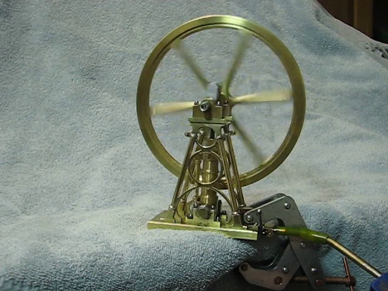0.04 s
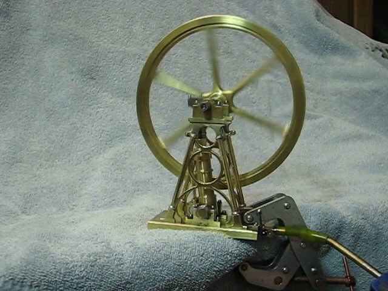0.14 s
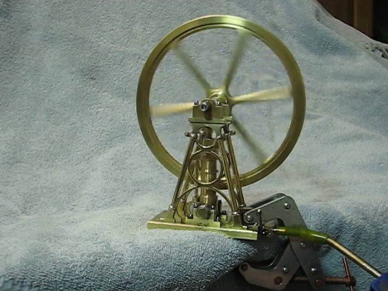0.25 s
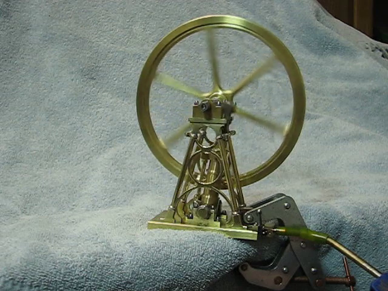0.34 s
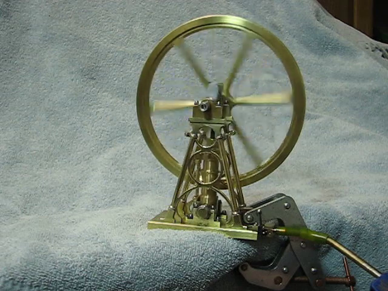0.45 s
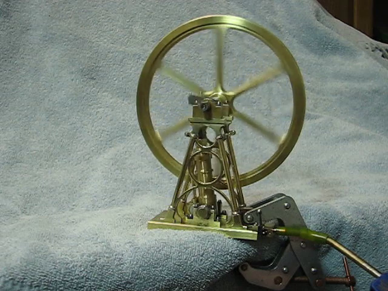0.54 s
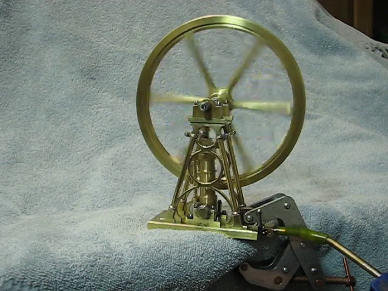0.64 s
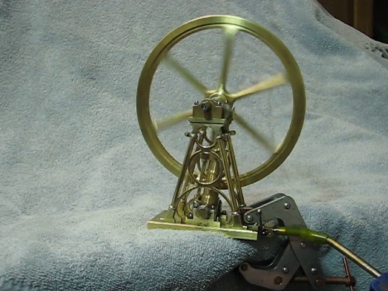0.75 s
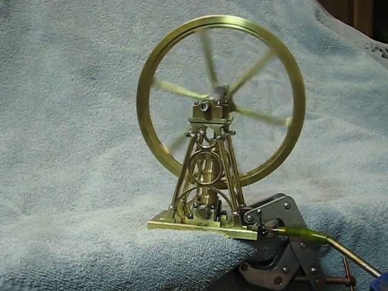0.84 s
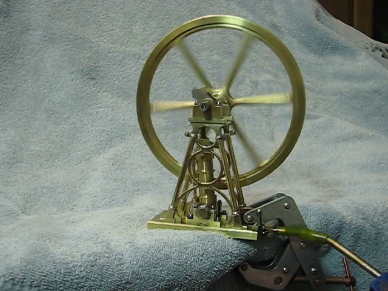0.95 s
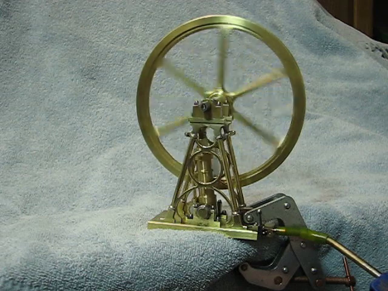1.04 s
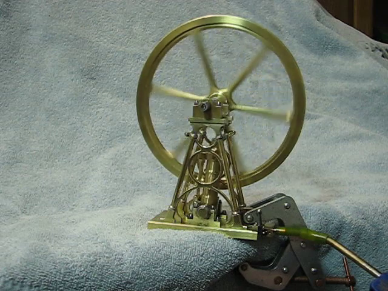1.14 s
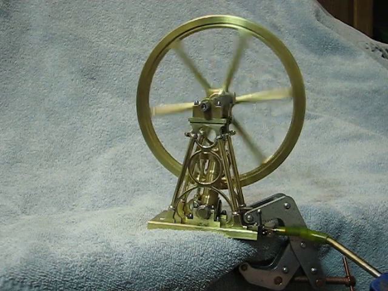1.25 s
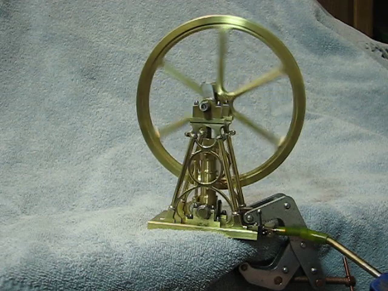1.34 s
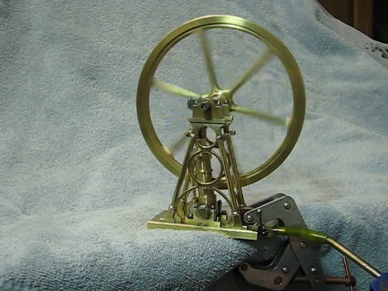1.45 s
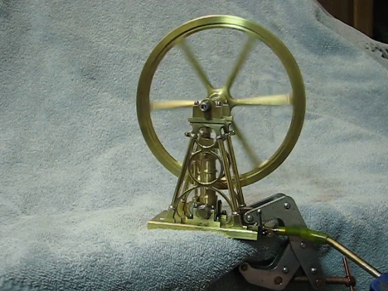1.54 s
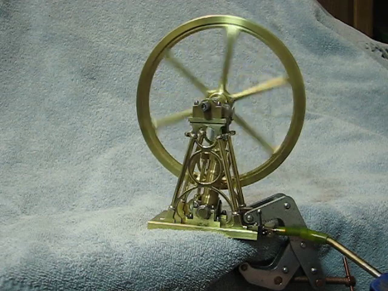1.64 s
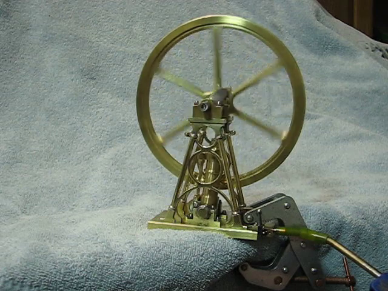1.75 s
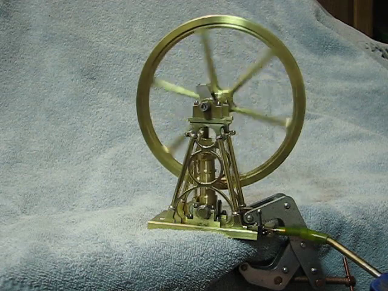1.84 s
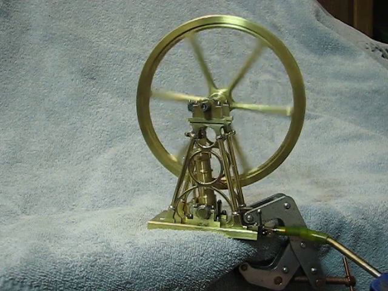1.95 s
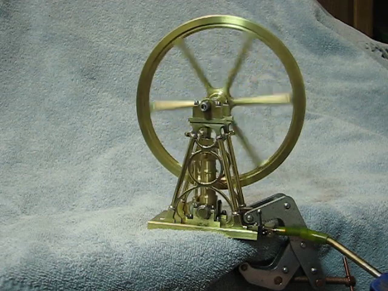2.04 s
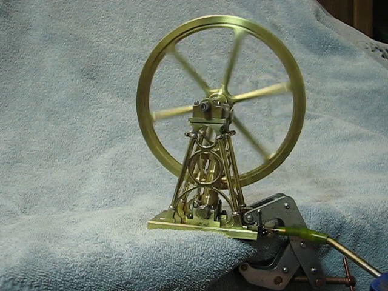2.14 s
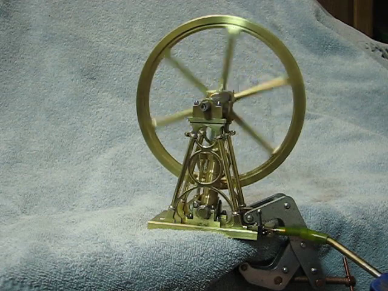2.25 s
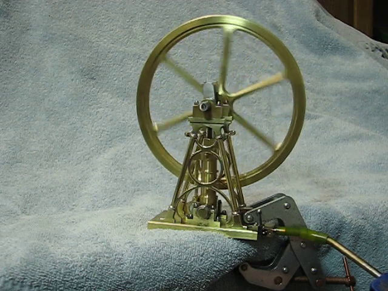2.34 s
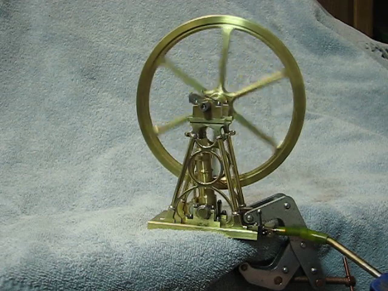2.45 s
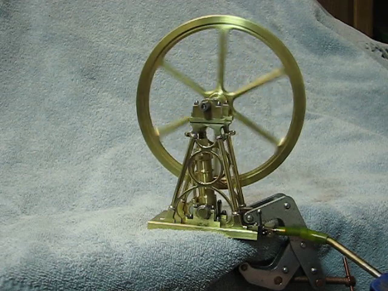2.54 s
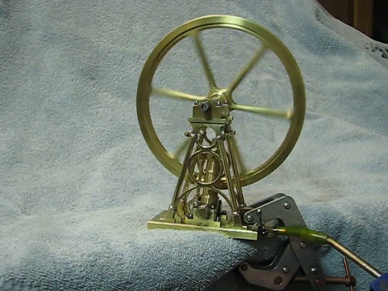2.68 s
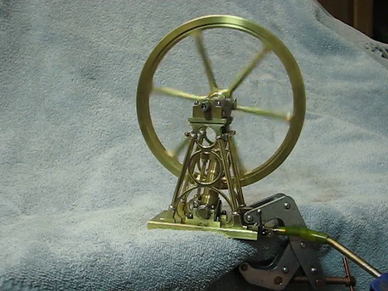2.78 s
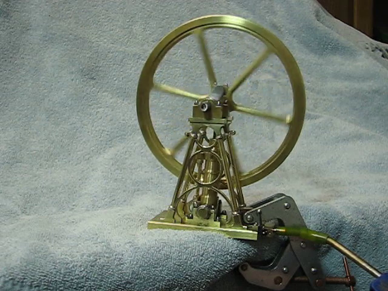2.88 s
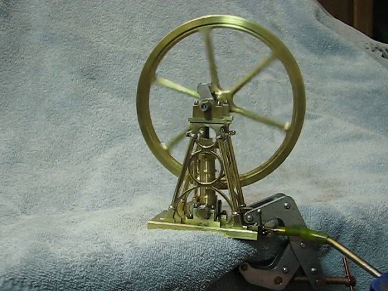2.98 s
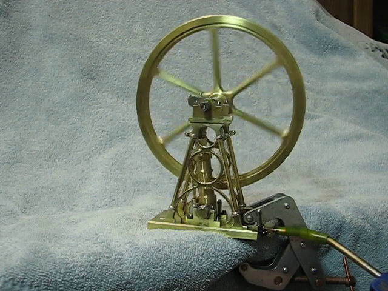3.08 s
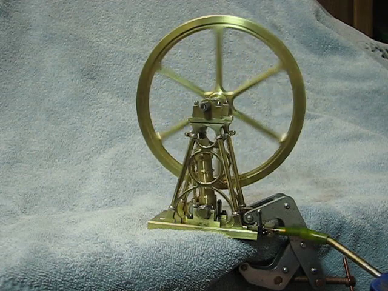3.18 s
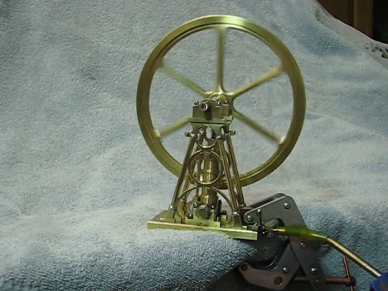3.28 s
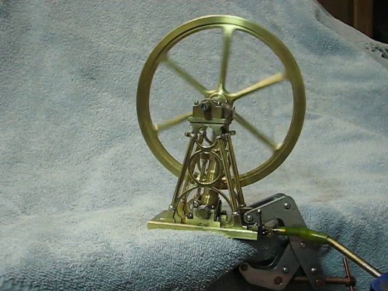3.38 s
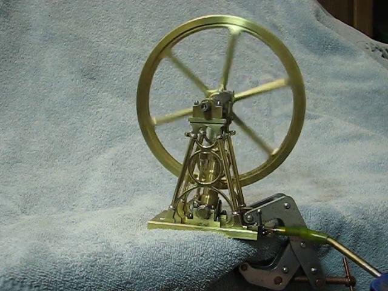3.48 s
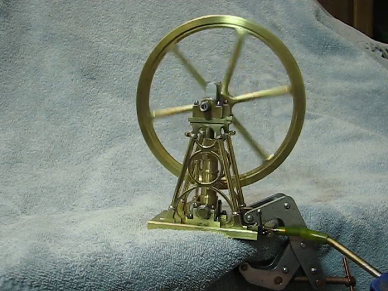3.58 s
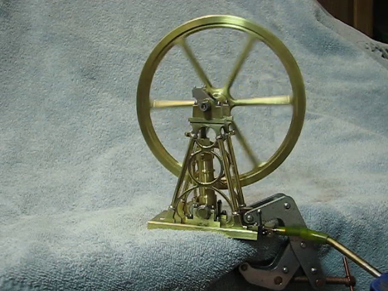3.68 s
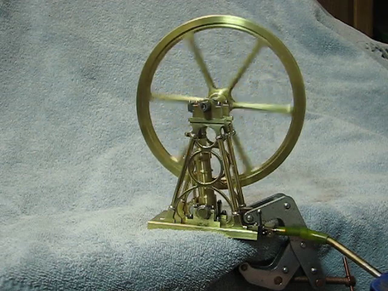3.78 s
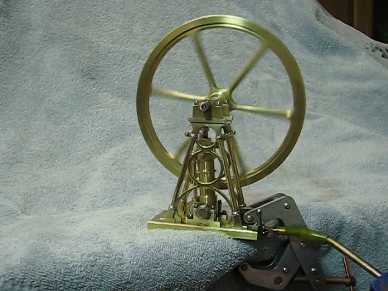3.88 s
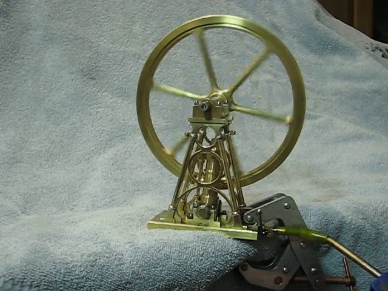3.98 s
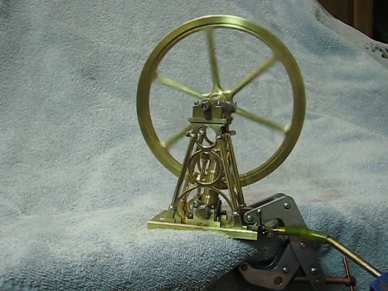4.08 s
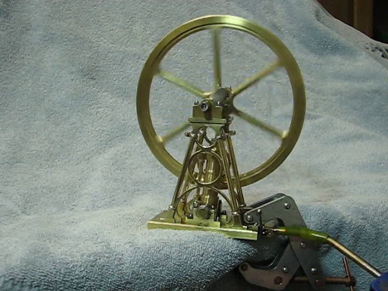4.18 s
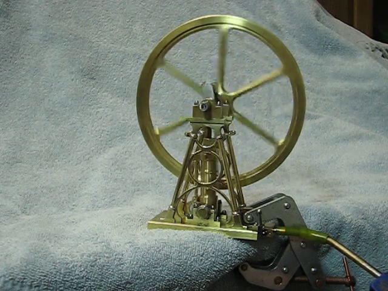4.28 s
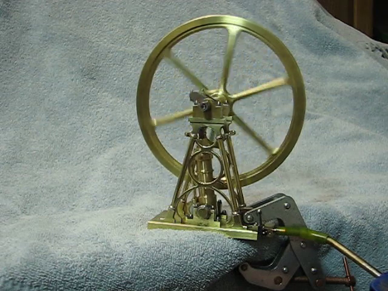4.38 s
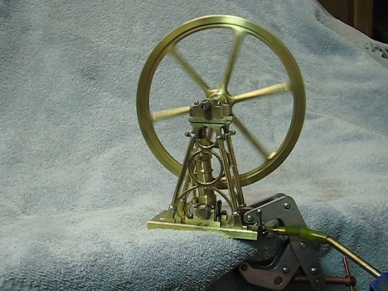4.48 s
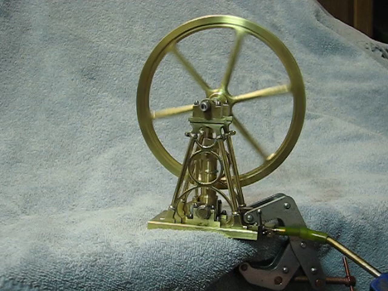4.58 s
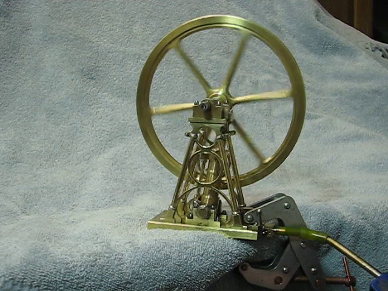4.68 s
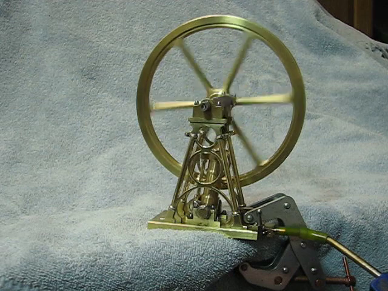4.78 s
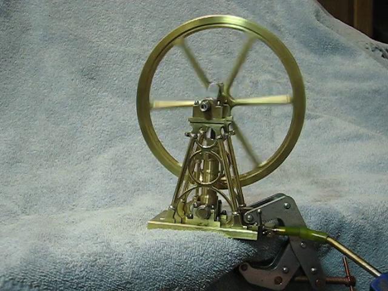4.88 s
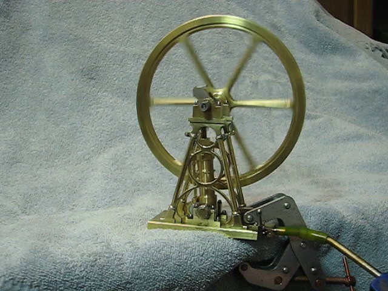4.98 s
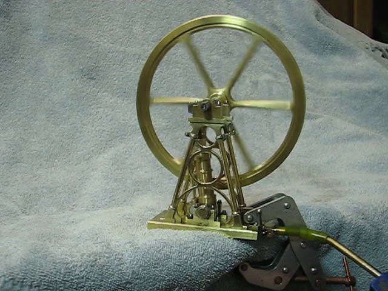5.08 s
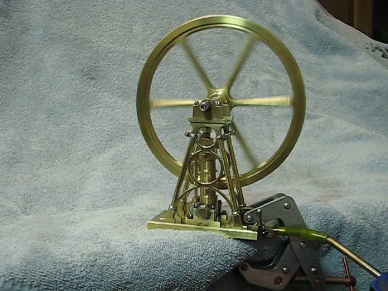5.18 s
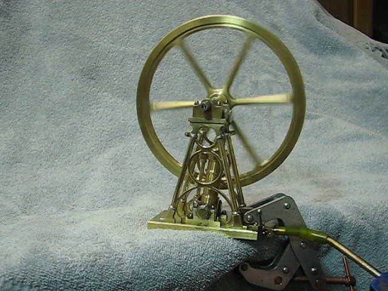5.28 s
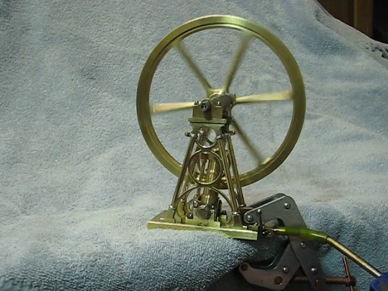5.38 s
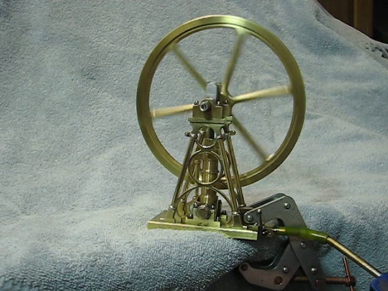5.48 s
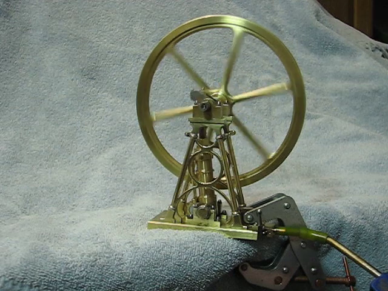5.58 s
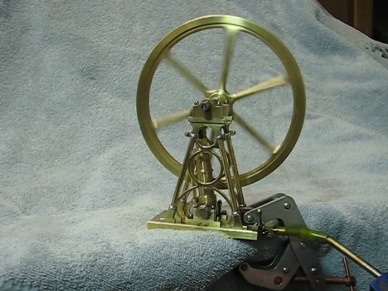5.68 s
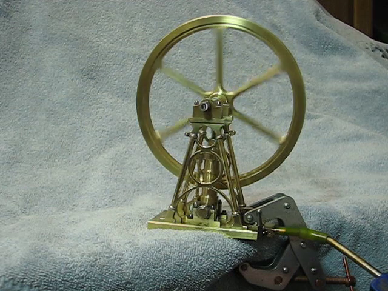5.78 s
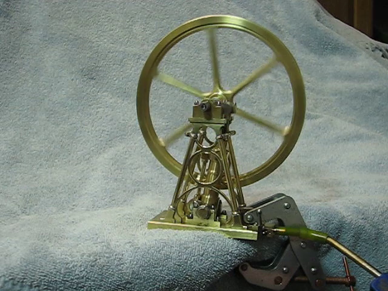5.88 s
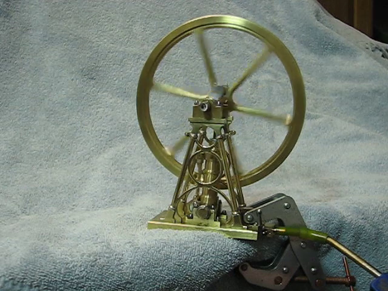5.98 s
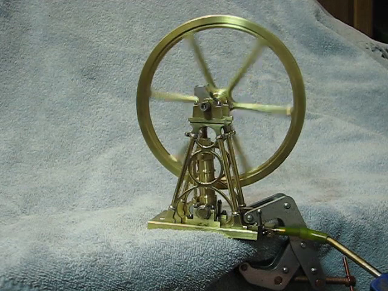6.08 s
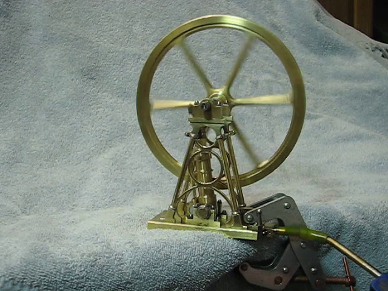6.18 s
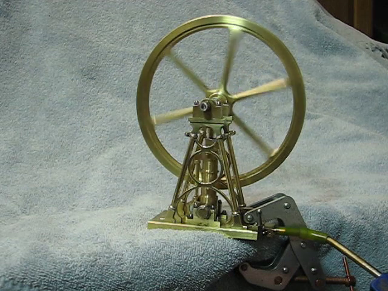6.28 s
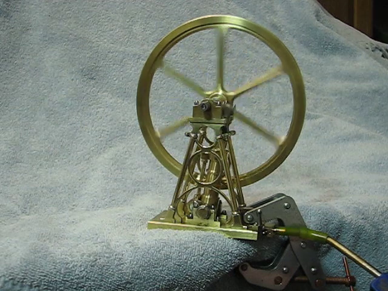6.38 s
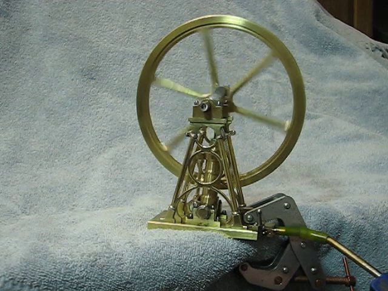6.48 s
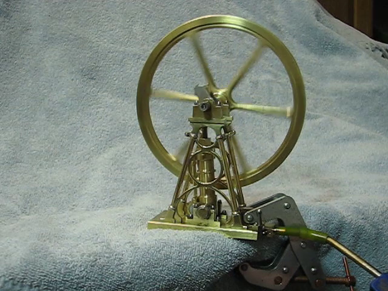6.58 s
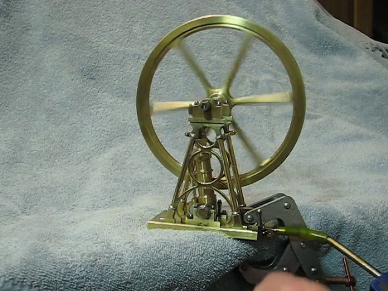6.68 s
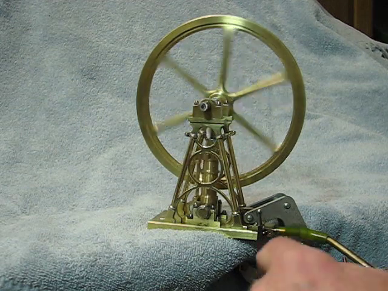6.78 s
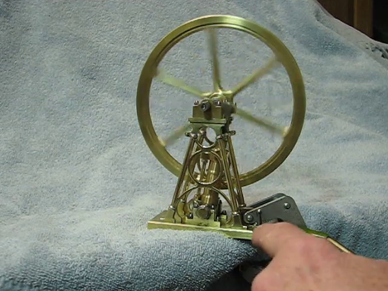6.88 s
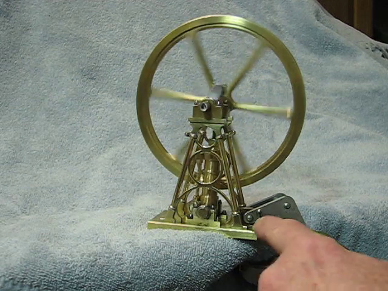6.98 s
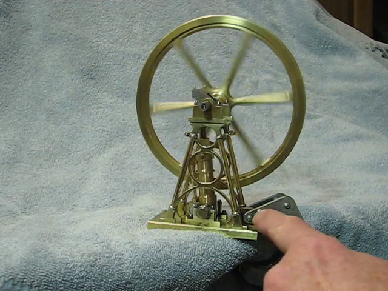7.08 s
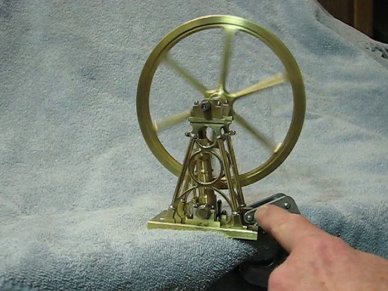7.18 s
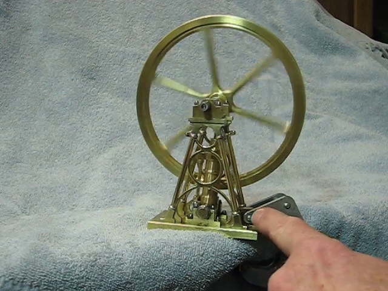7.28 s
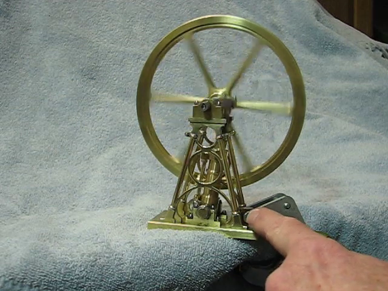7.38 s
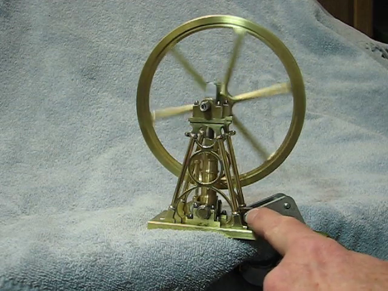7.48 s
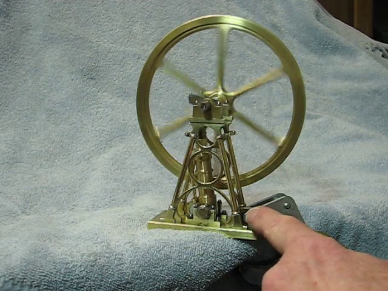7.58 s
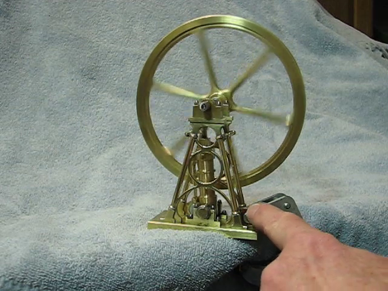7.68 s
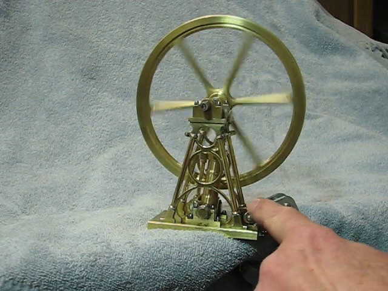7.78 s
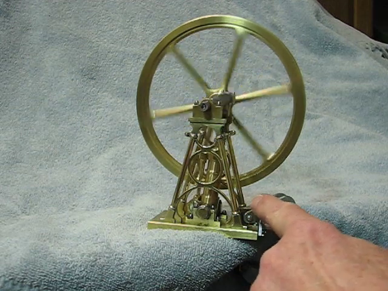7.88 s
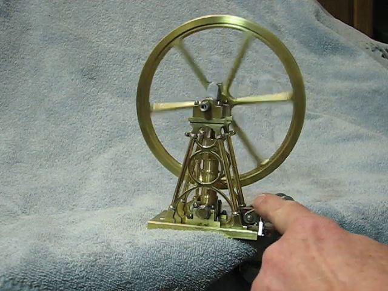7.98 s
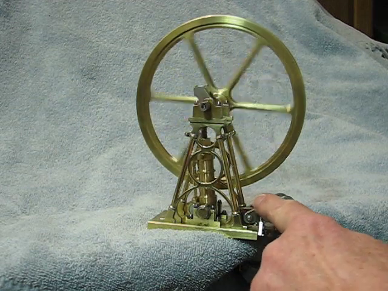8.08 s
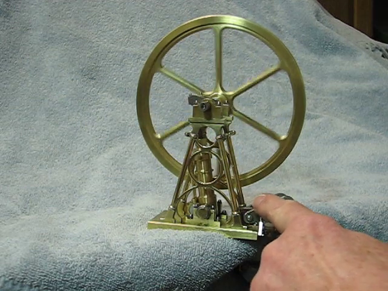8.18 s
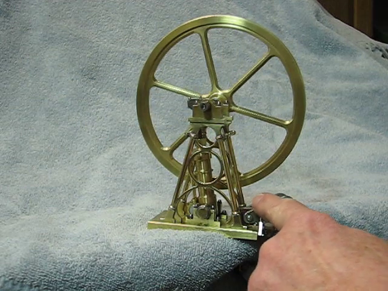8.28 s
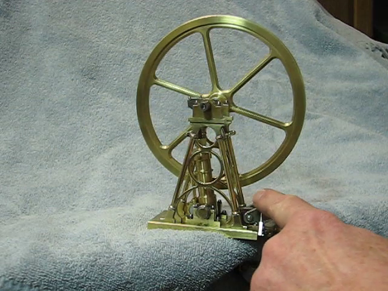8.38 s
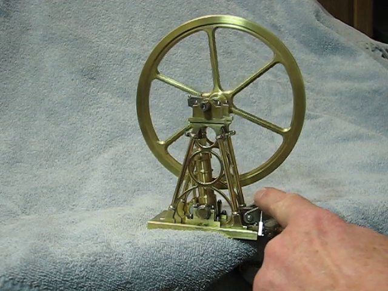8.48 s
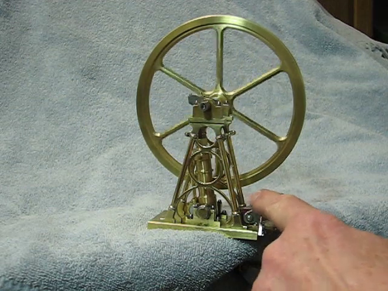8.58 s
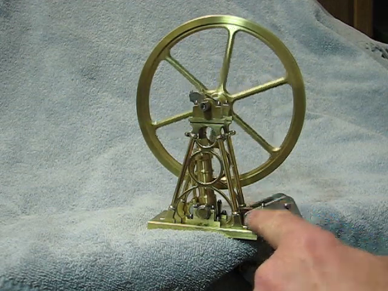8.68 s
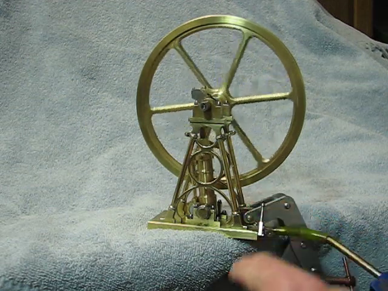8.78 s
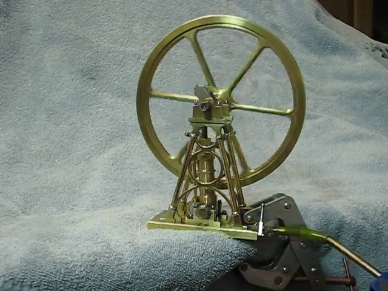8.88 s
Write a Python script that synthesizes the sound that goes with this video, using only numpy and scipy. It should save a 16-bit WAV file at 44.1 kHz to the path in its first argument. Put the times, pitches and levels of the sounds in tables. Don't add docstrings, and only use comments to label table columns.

```python
import sys
import numpy as np
from scipy import signal
from scipy.fft import rfft, irfft, next_fast_len
from scipy.io import wavfile
from scipy.ndimage import uniform_filter1d

SR = 44100
rng = np.random.default_rng(int(sys.argv[2]) if len(sys.argv) > 2 else 0)


def generate_wav(signal):
    frames = np.transpose(np.atleast_2d(signal))
    scaled = np.clip(frames, -1, 1) * 32767
    pcm = np.round(scaled).astype(np.int16)
    wavfile.write(sys.argv[1], SR, pcm)


def decibels_to_gain(level_db):
    exponent = np.asarray(level_db, float) / 20
    return 10 ** exponent


N = 394235
TIME = np.arange(N) / SR
STEPS = TIME[::16]
HZ = np.fft.rfftfreq(next_fast_len(N + SR // 4), 1 / SR) + 1
LENGTH = 2 * (len(HZ) - 1)

# opens_s, shuts_s, puff_db, late_flow_db, valve_crosses_s
PUFFS = [(-0.075, 0.034, -23.5, -1, 0.058), (0.327, 0.434, -24.5, 1, 0.461),
         (0.745, 0.859, -24.5, -1, 0.882), (1.183, 1.301, -24.5, 3, 1.324), (1.641, 1.767, -26, 0, 1.8),
         (2.149, 2.283, -25, 0, 2.333), (2.717, 2.87, -26.5, 2, 2.919), (3.358, 3.523, -25, -1, 3.562),
         (4.025, 4.199, -26, 2, 4.233), (4.684, 4.85, -25, -4, 4.878), (5.29, 5.447, -25, 0, 5.47),
         (5.843, 5.986, -24.5, -1.5, 6.006), (6.359, 6.495, -25, -2, 6.52), (6.854, 6.978, -24.5, 0, 7.007),
         (7.325, 7.45, -24.5, 0, 7.482)]
# spit_db, peak_db, half_width_s, seep_db, gasp_db
SWELLS = [(-42, -22.5, 0.032, -42, -57), (-37.5, -23, 0.036, -41.5, -55),
          (-31.5, -23.5, 0.0365, -41.5, -43), (-33.5, -24, 0.032, -44.5, -61), (-46, -26, 0.038, -49, -62),
          (-36.5, -27, 0.047, -53.5, -67), (-42.5, -25.5, 0.049, -52, -35.5), (-32, -27, 0.048, -44.5, -37),
          (-29, -25.5, 0.044, -41.5, -32), (-25, -22.5, 0.05, -39, -31), (-22.5, -23, 0.051, -40.5, -30),
          (-25, -23, 0.051, -40, -31.5), (-24, -21.5, 0.046, -38.5, -37), (-25, -22.5, 0.039, -39.5, -38),
          (-24, -24, 0.039, -39, -35)]
SHUT_OFF_S = 7.715
MID_STROKE = 0.6752
STEADY_SEEP_DB = -41.5


def rms_one(x):
    return x / np.sqrt(np.mean(x ** 2) + 1e-20)


def at_hz(points):
    hz, *columns = np.transpose(points)
    return [np.interp(np.log(HZ), np.log(hz), c) for c in columns]


def line_db(seconds, db):
    return decibels_to_gain(np.interp(STEPS, seconds, db, left=-150, right=-150))


def fine(gain):
    return np.interp(TIME, STEPS, gain)


def peak(hz, width_hz):
    return 1 / (1 + (2 * (HZ - hz) / width_hz) ** 2) ** 2


def drift(rate_hz):
    r = np.exp(-2 * np.pi * rate_hz / SR)
    noise = rng.standard_normal(N + SR)
    return rms_one(signal.lfilter([1], [1, -2 * r, r * r], noise)[SR:])


def at_ports(gain, colour, alike=0.94):
    # hz, left_over_right_db
    shading = [(2000, -.5), (2900, -7), (3250, -12), (3750, 3), (5200, -6), (6450, 1), (7450, -13),
               (8100, 4), (8550, -1.5), (10250, 13), (11600, -6), (11950, 2), (13050, -15), (13700, 4),
               (15200, -6)]
    # hz, right_leads_rad
    phase_lead = [(300, -.1), (3100, .7), (3450, -1.4), (4000, .6), (5600, -.1), (6600, .8), (7200, .4),
                  (8000, -2.5), (8150, .9), (9100, -.3), (10200, .5), (11300, 2.4), (12300, 3.5),
                  (13100, 3.8), (13250, 1.6), (14700, 3.8)]
    # hz, coherence_0_to_1
    coherence = [(30, .8), (100, .93), (250, .98), (520, .62), (1200, .99), (3000, .88), (3500, .4),
                 (4100, .9), (6300, .97), (7200, .97), (8000, .3), (8600, .94), (9600, .95), (10200, .5),
                 (12600, .9), (15000, .3)]
    (balance_db,), (lead,), (likeness,) = at_hz(shading), at_hz(phase_lead), at_hz(coherence)
    share = np.clip(likeness * alike, 0, 1)
    mid, side = rfft(rng.standard_normal((2, N)) * gain, LENGTH)
    left = decibels_to_gain(balance_db / 2)
    right = np.exp(1j * lead) / decibels_to_gain(balance_db / 2)
    colour = colour / np.sqrt((abs(left) ** 2 + abs(right) ** 2) / 2)
    colour = colour / np.sqrt(np.mean(colour ** 2) * 2)
    common = np.sqrt(1 + share) * mid
    own = np.sqrt(1 - share) * side
    ports = np.array([left * (common + own), right * (common - own)])
    return irfft(colour * ports, LENGTH)[:, :N]


def workshop():
    # hz, db_per_hz
    room_colour = [(10, -16), (22, 5), (45, -5.5), (75, -5), (160, -2.5), (300, -4.5), (495, -11),
                   (800, -11), (1400, -15), (2500, -17), (5000, -27), (8000, -50), (10700, -49),
                   (15500, -45)]
    # hz, width_hz, over_noise_db
    drones = [(239, 14, 10.5), (325.7, 12, 7), (750, 18, 5.5), (914, 14, 6.5)]
    # hz, rms_db
    hum = (120, -57)
    humps_db = sum(db * peak(hz, width_hz) for hz, width_hz, db in drones)
    colour = decibels_to_gain(at_hz(room_colour)[0] + humps_db)
    noise = at_ports(decibels_to_gain(-53 + 0.73 * drift(5.8)), colour, alike=0.96)
    hum_hz, hum_db = hum
    return noise + decibels_to_gain(hum_db + 2.5 + .5 * drift(1.5)) * np.sin(2 * np.pi * hum_hz * TIME)


def supply():
    # time_s, level_db
    supply_pressure = [(0.0, -51.5), (1.09, -50.5), (1.6, -58), (3.06, -54.5), (3.31, -48), (3.78, -50),
                       (4.3, -45.5), (4.95, -44.5), (6.35, -44), (6.7, -47), (7.72, -45.5), (8.14, -47.5),
                       (8.94, -46)]
    # hz, db_per_hz
    hose_colour = [(290, -47), (500, -11), (901, -11.5), (968, -17), (1220, -7.5), (1370, -10),
                   (2070, -5.5), (2570, -4.5), (5670, -4.5), (6360, -5), (8240, 1.5), (9240, -8),
                   (15500, -8.5)]
    # hz, width_hz, over_hiss_db
    hose_peaks = [(8380, 190, 5), (9800, 880, 1), (12200, 350, 7)]
    # hz, width_hz
    fitting = (13050, 520)
    hand_s, hand_covers_s, hand_shade_db = 6.3, .5, 4.5
    seconds, hose_db = np.transpose(supply_pressure)
    peaks_db = sum(db * peak(hz, width_hz) for hz, width_hz, db in hose_peaks)
    colour = decibels_to_gain(at_hz(hose_colour)[0] + peaks_db)
    unrest = decibels_to_gain(.6 * drift(6))
    hiss = at_ports(fine(line_db(seconds, hose_db + 3.5)) * unrest, colour, alike=0.65)
    covered = np.clip((TIME - hand_s) / hand_covers_s, 0, 1)
    whistle_db = -50.5 - hand_shade_db * covered
    whistle_gain = decibels_to_gain(whistle_db + 0.76 * drift(16))
    return hiss + at_ports(whistle_gain, np.sqrt(peak(*fitting)), alike=0.75)


def jet(gain, order, flutter_db):
    # hz, width_hz, puff_db, return_stroke_db, seep_db, last_sigh_db
    cavity_modes = [(1093, 240, -25, -21.5, -19, -40), (2740, 620, -15.5, -15, -7.5, -9),
                    (3087, 700, -20, -24, -2.5, 0.5), (4250, 560, -16.5, -15.5, -7, -1),
                    (4370, 150, -30, -54, -5.5, 6), (3210, 140, -27, -15.5, -7, -4),
                    (4840, 870, -24, -14, -10, -19), (6720, 713, -1.37, 0, -0.9, -19),
                    (7155, 840, -6.5, -5, -7, -24), (8400, 670, -15.5, -21, -11, -28),
                    (9436, 564, -9, -12, -10.5, -31), (9830, 1140, -16.5, -39, -43, -32),
                    (11880, 600, -16, -19, -14.5, -30), (12700, 900, -37, -37, -24, -36),
                    (14700, 1200, -27, -67, -53, -44), (4940, 7800, -45, -27, -18.5, -29)]
    # hz, width_hz, gain_db
    notches = [(3890, 240, 1.5), (5800, 440, -3), (7900, 280, 0), (11430, 300, -4)]
    power = sum(decibels_to_gain(db[order]) ** 2 * peak(hz, width_hz) for hz, width_hz, *db in cavity_modes)
    notch_db = sum(db * peak(hz, width_hz) for hz, width_hz, db in notches)
    cavities = np.sqrt(power) * decibels_to_gain(notch_db)
    eddies = decibels_to_gain(flutter_db * (.6 * drift(60) + drift(300)))
    steep = HZ ** 2 / (HZ ** 2 + 1200 ** 2)
    return at_ports(fine(gain) * eddies, cavities * steep)


def puffs():
    # share_of_open_time, under_peak_db
    puff_shape = [(-.1, -47), (-.01, -15), (.04, -2), (.09, -4), (.42, 1.5), (.7, -1), (.95, -8),
                  (.99, -17), (1.08, -21)]
    share, shape_db = np.transpose(puff_shape)
    late = np.clip((share - .42) / .5, 0, 1)
    gain = 0
    for opens, shuts, db, late_db, _ in PUFFS:
        gain = gain + line_db(opens + share * (shuts - opens), db + shape_db + late_db * late)
    return jet(gain, order=0, flutter_db=0.5)


def crank(share):
    last_turn_ends_s = 7.79
    starts = np.append(np.transpose(PUFFS)[0], last_turn_ends_s)
    turn = np.diff(starts)
    return starts[:-1] + share * turn - share * (1 - share) / 2 * np.gradient(turn)


def valve():
    spit_share, gasp_share = .119, 0.926
    opens, shuts, *_, crosses = np.transpose(PUFFS)
    ends = shuts + crank(spit_share) - opens
    return zip(crosses, ends, crank(MID_STROKE), np.minimum(crank(gasp_share), SHUT_OFF_S))


def return_strokes():
    # start_s, peak_db
    droplets = [(0.1595, -24), (0.3308, -16), (0.5781, -26), (0.7472, -20), (1.185, -26), (1.4576, -26),
                (1.646, -22), (2.155, -23), (2.1856, -23), (2.5045, -17), (2.813, -16), (3.1012, -24),
                (3.141, -20), (3.362, -20), (3.396, -13), (4.035, -17.5), (4.08, -19), (4.6927, -22),
                (5.0474, -25), (5.3007, -15), (5.857, -19), (6.2066, -22), (6.3699, -10.5), (6.6608, -28),
                (6.8545, -31), (6.9254, -21), (7.1312, -25), (7.3348, -17)]
    gain, pops = 0, list(droplets)
    for (opens, shuts, middle, gasp), (spit_db, db, half, _, gasp_db) in zip(valve(), SWELLS):
        spit_s = [opens - .008, opens + 0.006, shuts - .014, shuts - .004, shuts + 0.0069]
        gain = gain + line_db(spit_s, spit_db + np.array([-14, -6.5, 0.8, -9.5, -15]))
        away = abs(STEPS - middle) / half
        gain = gain + decibels_to_gain(db - 0.5 - 6.28 * np.minimum(away, 12) ** 2.54)
        gasp_s = [gasp - .03, gasp, gasp + 0.03]
        gain = gain + line_db(gasp_s, gasp_db + np.array([-14, -1.5, -18]))
        pops.append((opens + 0.0068, spit_db + 2.5))
    for s, db in pops:
        gain = gain + line_db([s - .001, s + 0.0022, s + 0.0022], db + np.array([-18, -5, -20]))
    return jet(gain, order=1, flutter_db=1.0)


def seep():
    sag_db = 5.5
    starves_s, starve_db = .05, 9
    gain = 0
    for (opens, shuts, middle, gasp), (spit_db, _, half, before_db, _) in zip(valve(), SWELLS):
        seconds = [opens - .01, opens + 0.011, shuts - .004, shuts + 0.017,
                   middle - 2.27 * half, middle, middle + 1.9 * half, gasp, gasp + 0.023]
        after_db = before_db - sag_db
        top_db = -33 - .15 * (before_db - STEADY_SEEP_DB)
        burst_db = max(before_db, min(spit_db - 1.0, -43))
        rising_db = 0.54 * before_db + 0.49 * top_db
        falling_db = 0.53 * after_db + 0.42 * top_db
        levels_db = [before_db - 28, burst_db, burst_db + 0.5, before_db - 1.5,
                     rising_db, top_db - 3.5, falling_db, after_db, after_db - 7]
        gain = gain + line_db(np.sort(seconds), levels_db)
    starved = np.clip(1 + (STEPS - SHUT_OFF_S) / starves_s, 0, 1)
    return jet(gain * decibels_to_gain(1.0 - starve_db * starved), order=2, flutter_db=2.0)


def unsteady(engine, patchy_db, db_per_db):
    patch_edges_hz = [2100, 3600, 5700, 7800, 8900, 10900]
    seep_db = np.interp(TIME, crank(MID_STROKE), np.transpose(SWELLS)[3])
    bright_db = 0.44 * (seep_db - STEADY_SEEP_DB)
    flow_db = 10 * np.log10(uniform_filter1d(np.mean(engine ** 2, axis=0), size=600) + 1e-6)
    lift = decibels_to_gain(bright_db + db_per_db * (flow_db + 21.5))
    spectrum, group = rfft(engine, LENGTH), np.digitize(HZ, patch_edges_hz)
    out = 0
    for k in range(len(patch_edges_hz) + 1):
        band = irfft(spectrum * (group == k), LENGTH)[:, :N] * decibels_to_gain(patchy_db * drift(17))
        out = out + band * (lift if k > 3 else 1)
    return out


def last_leak():
    # arrives_s, holds_s, fades_20_db_in_s, low_sigh_db, bright_seep_db
    trapped_air = [
        (8.008, .012, .07, -44, -39.5),
        (8.3, .2, .26, -40.5, -58),
        (8.817, .05, 0.2, -46, -50),
    ]
    rise_share = .6
    sigh = bright = 0
    for s, hold, fade, sigh_db, bright_db in trapped_air:
        shape = line_db([s - rise_share * fade, s, s + hold, s + hold + fade], [-20, 0, 0, -22])
        sigh = sigh + decibels_to_gain(sigh_db) * shape
        bright = bright + decibels_to_gain(bright_db) * shape
    return jet(sigh, order=3, flutter_db=1.0) + jet(bright, order=1, flutter_db=0.5)


def echoes(x):
    t60_s, level_db = .15, -18
    t = TIME[:SR // 3]
    tail = rng.standard_normal((2, len(t))) * decibels_to_gain(-60 * t / t60_s) * (t > .004)
    tail = tail / np.sqrt(np.sum(tail ** 2, axis=1, keepdims=True))
    return decibels_to_gain(level_db) * signal.fftconvolve(x, tail, axes=1)[:, :N]


def scene():
    engine = unsteady(puffs() + return_strokes() + seep(), patchy_db=1.07, db_per_db=0.23)
    engine = engine + last_leak()
    return workshop() + supply() + engine + echoes(engine)


def low_pass(x):
    return signal.sosfilt(signal.butter(12, 15660, fs=SR, output="sos"), x)


def record(dry):
    roll_off = signal.butter(10, 14600, fs=SR, output="sos")
    cut = signal.cheby2(24, 70, 16000, fs=SR, output="sos")
    mix = signal.sosfilt(cut, signal.sosfilt(roll_off, dry))
    return low_pass(mix)


dry = scene()
out = record(dry)
generate_wav(out)
```